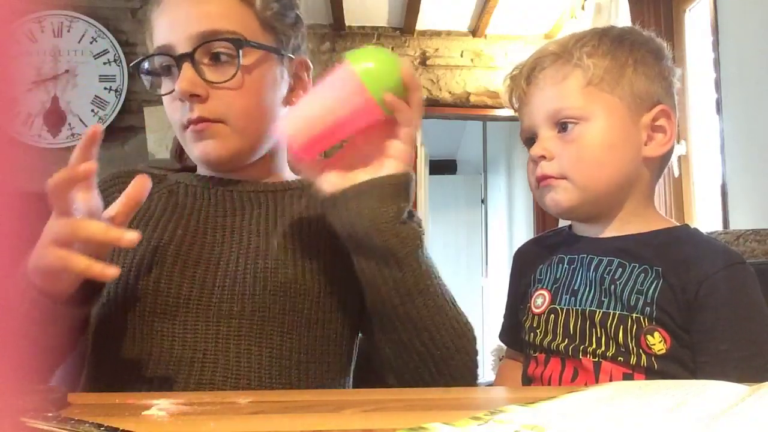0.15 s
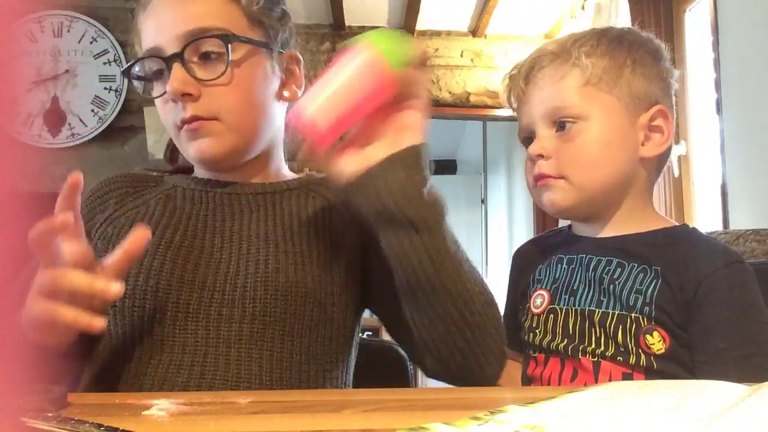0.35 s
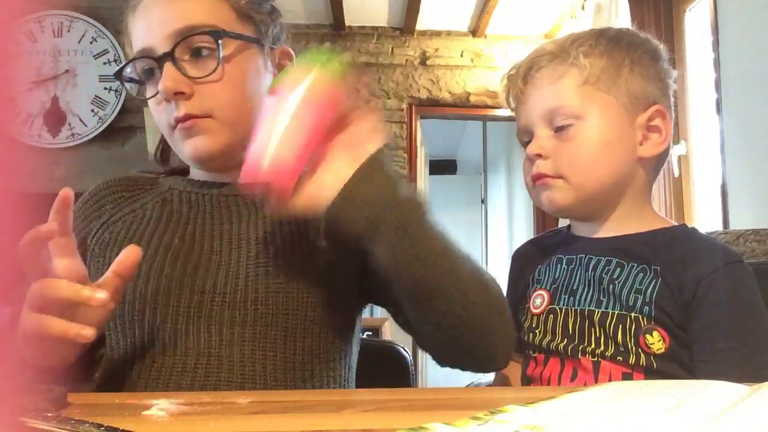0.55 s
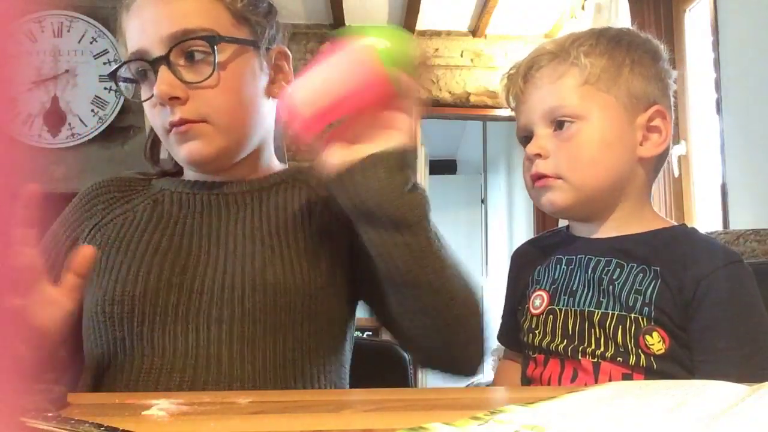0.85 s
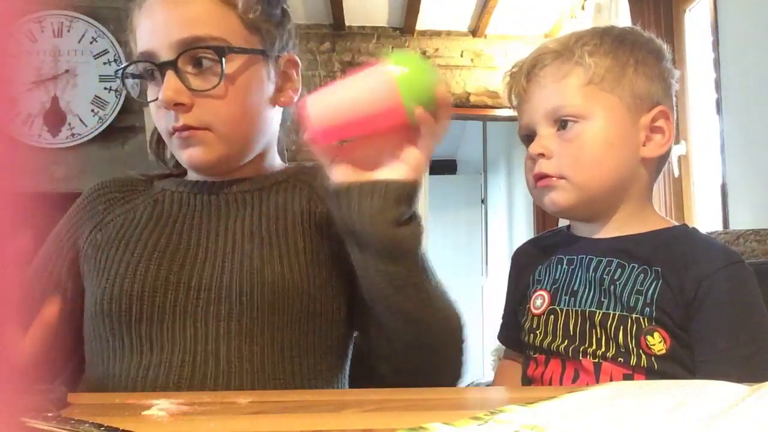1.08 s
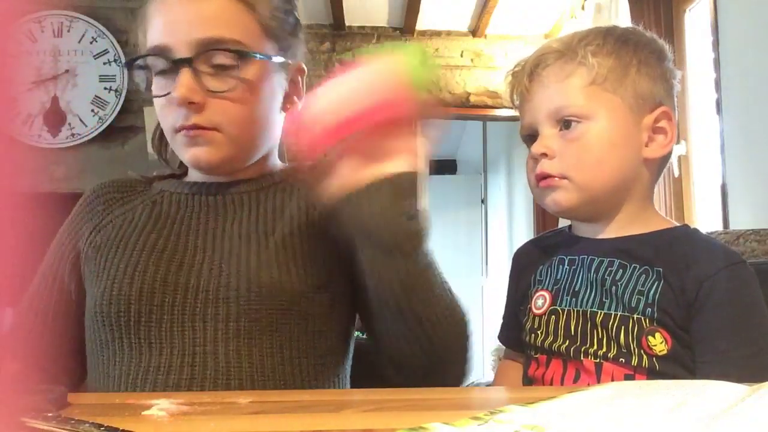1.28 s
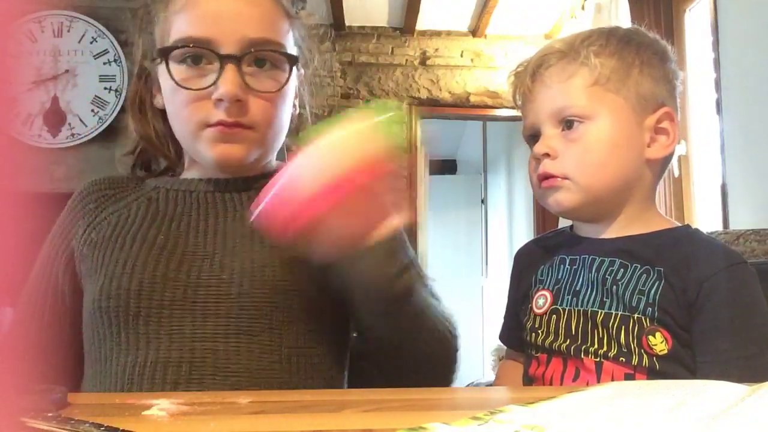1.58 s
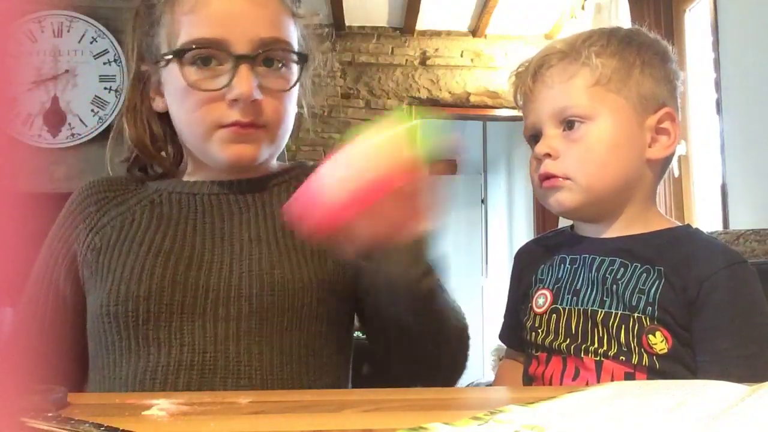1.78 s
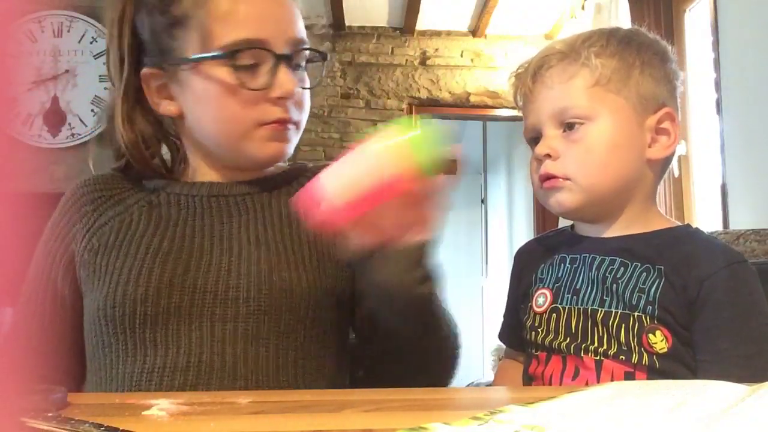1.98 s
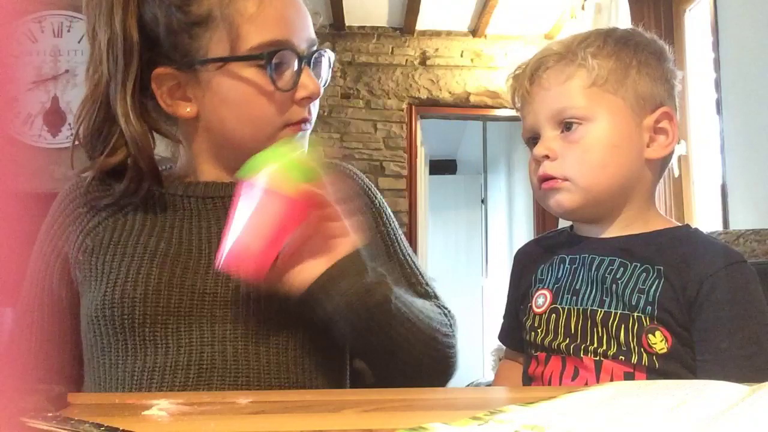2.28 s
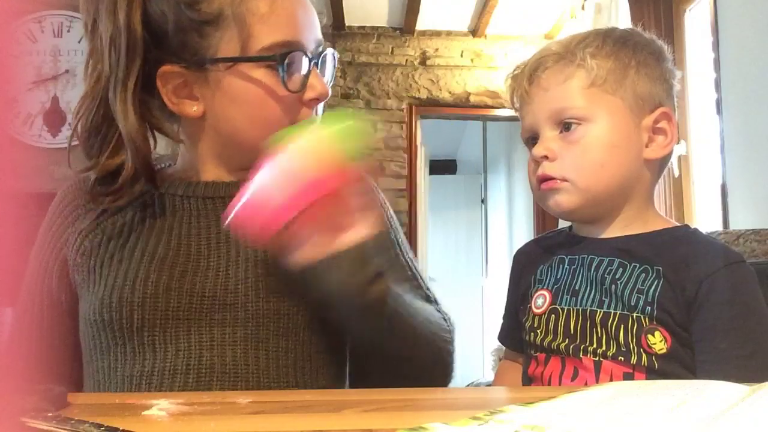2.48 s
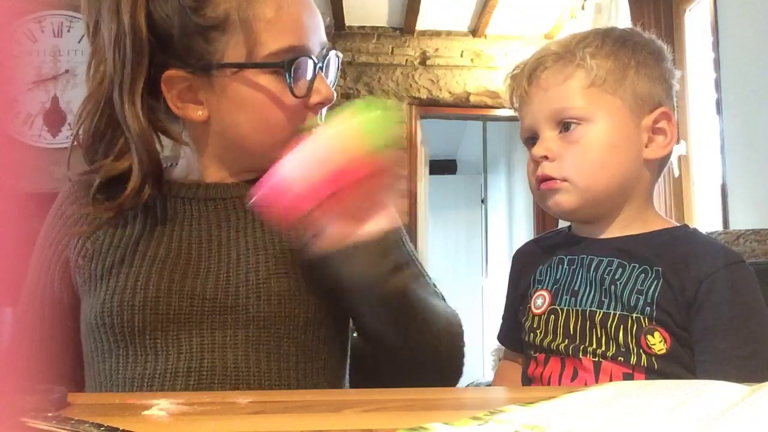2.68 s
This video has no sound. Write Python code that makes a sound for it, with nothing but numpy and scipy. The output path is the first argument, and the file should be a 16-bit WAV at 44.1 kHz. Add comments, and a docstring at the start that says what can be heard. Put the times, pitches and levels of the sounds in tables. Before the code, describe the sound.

Irregular hollow knocks and watery plops from a shaken plastic cup of drink, close by indoors

```python
"""Sharp knocks come first: a lidded plastic cup of drink, shaken by hand in a quiet room at home.
At each turn of the stroke the contents strike wall and lid, ringing the cup's modes and a band of high clicks.
Trapped air rings as short rising plops; splashes and stray bubbles tick as many small damped sines.
The room adds a short noise-like tail; behind it lie a faint hiss of shaped noise and a few dull bumps."""
import sys
import numpy as np
from scipy import signal
from scipy.fft import rfft, irfft
from scipy.io import wavfile

SR = 44100
rng = np.random.default_rng(int(sys.argv[2]) if len(sys.argv) > 2 else 0)


def master(y):
    """Save y as 16-bit WAV."""
    cut = np.clip(np.atleast_2d(y).T, -1, 1)
    pcm = np.round(cut * 32767)  # scale
    wavfile.write(sys.argv[1], SR, pcm.astype(np.int16))


N = 125685

# contents strike the cup: [t/s, hollow thud level/dB, wall knock level/dB, click level/dB, click f/Hz]
KNOCK_EVENTS = [(0.1034,-70.5,-60.5,-61,5260), (0.197,-81,-71.5,-56,4740), (0.2285,-49,-66,-46,4900),
                (.335,-59,-53,-48.5,4270), (0.3413,-33,-38.5,-36,4620), (0.4452,-62,-56,-65,4360),
                (0.452,-77,-55,-47,4800), (0.4644,-58,-50.5,-52,4100), (0.553,-58.5,-64,-53,4830),
                (0.563,-61,-57,-43.5,4700), (.6342,-89,-47,-46,5130), (0.667,-67,-43.5,-43,4360),
                (0.781,-56.5,-60.5,-41,4580), (0.7956,-80,-61,-40,5780), (.8787,-79,-47,-43.5,5200),
                (1.021,-65,-52,-49.5,5300), (1.1062,-47,-31,-42,4600), (1.216,-91,-92,-54.5,5600),
                (1.2476,-58.5,-54,-42.5,4320), (1.303,-52,-46,-43,5230), (1.3245,-55.5,-51.5,-55,4800),
                (1.3365,-81,-75,-44.5,4280), (1.452,-76,-64,-53,4180), (1.463,-53.5,-97,-45.5,5450),
                (1.528,-74,-56,-45.5,5130), (1.55,-60.5,-57.5,-35.5,4800), (1.558,-74,-93,-43.5,4720),
                (1.6736,-77,-58,-40,5440), (1.7921,-68,-57,-58,4800), (1.9037,-92,-52,-67,5360),
                (1.91,-49,-47,-48,4900), (1.9739,-60,-79,-50.5,4700), (2.062,-76,-63.5,-54.5,4220),
                (2.148,-47,-55,-54.5,5700), (2.2269,-85,-64,-64,4800), (2.235,-51.5,-42.5,-53,5950),
                (2.2512,-57.5,-47.5,-58,4470), (2.305,-63,-73,-64,4500), (2.328,-66,-65,-49,5300),
                (2.3318,-49.5,-58,-40.5,5340), (2.3385,-51.5,-43,-77,5440), (2.4656,-62,-58,-54.5,4800),
                (2.516,-66,-57,-58,5200), (2.569,-52,-77,-49,5030), (2.5782,-83,-55.5,-50.5,4760),
                (2.6864,-81,-68,-60,4450), (2.7796,-63,-76,-55,5700), (2.789,-55,-84,-78,5120),
                (2.815,-62,-66,-58,3700)]
# resonances of the filled cup, low to high: [f/Hz, level/dB, t60/s]
CUP_RESONANCES = [(434, -7, 0.025), (685, 4, 0.011), (790, 3.5, 0.024), (996, -3, 0.031), (1480, 3, 0.0015),
                  (1675, -4, 0.038), (1914, 7.5, 0.015), (2283, 0, 0.018)]
# air pockets ringing in the liquid: [t/s, starting f/Hz, level/dB, ring length/cycles to -60 dB]
AIR_POCKETS = [(.6340, 1044, -29.5, 14.5), (.6342, 1550, -26.5, 9.5), (0.667, 2490, -26, 16),
               (0.7968, 6300, -30, 27), (0.8782, 888, -21.5, 9.7), (.8786, 1350, -27, 14.7),
               (1.1062, 1770, -14.5, 17), (1.2250, 870, -39, 28), (1.2400, 790, -44.5, 36),
               (1.6796, 900, -34.5, 15.8), (1.682, 2210, -30, 47), (1.6900, 1082, -41, 44),
               (1.703, 2450, -40, 31), (1.7405, 2560, -34.5, 14.7), (1.9098, 628, -32.5, 21),
               (1.9726, 1010, -47, 37), (2.1473, 711, -28, 17.3), (2.3315, 736, -53, 70),
               (2.3391, 2160, -26.5, 12), (2.4613, 2560, -34, 15), (2.5692, 473, -26.5, 3.03),
               (2.5777, 1600, -37, 17), (2.6884, 830, -39.5, 7), (2.7812, 387, -34, 4.3),
               (2.7874, 1880, -40, 42)]
# liquid breaks against the wall: [t/s, length/s, droplet level/dB, typical droplet f/Hz, spray level/dB]
SPLASH_EVENTS = [(0.225, 0.022, -63, 4540, -93), (0.342, 0.024, -52, 3670, -53),
                 (0.449, 0.025, -55, 3130, -83), (0.551, 0.024, -52, 4650, -63.5),
                 (0.63, 0.036, -55, 3900, -80), (0.669, 0.038, -53, 2560, -85),
                 (0.784, 0.018, -52, 5200, -61), (0.883, 0.019, -58.5, 3830, -66),
                 (1.008, 0.046, -57.5, 4350, -91), (1.104, 0.03, -48, 2420, -61.5),
                 (1.216, 0.0091, -56.5, 5500, -69), (1.238, 0.014, -54.5, 4200, -83),
                 (1.302, 0.039, -50.5, 4380, -69), (1.46, 0.019, -51, 4830, -79),
                 (1.563, 0.01, -55, 4650, -75), (1.673, 0.026, -47.5, 4980, -76),
                 (1.788, 0.023, -62.5, 4740, -65.5), (1.901, 0.035, -58, 6050, -66),
                 (1.975, 0.033, -60.5, 5060, -85), (2.231, 0.014, -55, 4800, -84),
                 (2.326, 0.026, -47.5, 5640, -60.5), (2.565, 0.015, -56.5, 4800, -62),
                 (2.779, 0.015, -57.5, 5130, -69)]
# stray droplets over time: [t/s, level/dB]
SWIRL_LEVEL = [(0, -80.5), (.3, -75.5), (.5, -68), (1.0, -66.5), (1.6, -70), (1.87, -74.5), (2.0, -66.5),
               (2.13, -77.5), (2.45, -66.5), (2.75, -80), (2.82, -68.5)]
# stray droplets, weight by pitch: [f/Hz, level/dB]
SWIRL_SPECTRUM = [(500, 4), (1200, -4.5), (2200, 0.5), (3200, -3.5), (4900, -2), (6800, -10), (10000, -65)]
# room response: [f/Hz, early reflection level/dB, tail level/dB, tail t60/s]
ROOM_BANDS = [(150, -46, -4.5, 0.097), (396, -19.5, -10, 0.32), (920, -14.5, -11, 0.24),
              (2050, -7, -9, 0.28), (4800, -9.5, -7, 0.59), (7800, 2.5, -12, 0.098), (14100, -34, -18, 0.6)]
# dull bumps of an arm moving against the table: [t/s, f/Hz, level/dB]
ARM_BUMPS = [(.25, 173, -60), (1.737, 87.4, -55), (1.959, 86, -53), (2.021, 79, -52.5),
             (2.307, 120.5, -53.5), (2.397, 288, -50.5), (2.4, 87, -49), (2.459, 82, -56.5)]
# background hiss, relative spectrum: [f/Hz, level/dB]
HISS_SPECTRUM = [(20, -11.5), (60, 6), (120, 8), (300, 5), (700, -4), (1300, -20), (3000, -10),
                 (5000, -3.5), (9000, -9), (16000, -55)]

MODE_SCATTER_DB, MODE_DETUNE_SHARE = 2.0, 0.025  # standard deviations, per knock
THUD_TOP_HZ = 1300  # modes below form the thud, those above the wall knock
CLICK_T60_S, CLICK_HALF_WIDTH_SHARE = 0.014, 0.14  # dense high modes of thin plastic
PLOP_RISE_SHARE, PLOP_ATTACK_CYCLES = 0.17, 0.4
DROP_T60_CYCLES, DROP_SPREAD_DB, DROP_SPREAD_OCTAVES = 15.5, 5.5, 0.3
SPRAY_LOW_EDGE_HZ, SPRAY_T60_S = 6300, 0.035
SWIRL_DROPS_PER_S, SWIRL_SPREAD_DB = 1100, 4.5
RADIATION_HZ = 231  # a small cup radiates little below this
EARLY_T60_S, FIRST_ECHO_S = 0.16, 0.0032
BUMP_T60_CYCLES, BUMP_ATTACK_CYCLES = 12.6, 1
HISS_DB = -77.5
CUTOFF_HZ = 16000


def knocks():
    """Each knock rings the cup's low and middle modes and a dense cluster of high ones."""
    out, t = np.zeros(N), np.arange(SR // 20) / SR
    hz, db, t60 = np.transpose(CUP_RESONANCES)
    low = hz < THUD_TOP_HZ
    for s, thud_db, knock_db, click_db, click_hz in KNOCK_EVENTS:
        strength, detune = rng.standard_normal((2, len(hz)))
        mode_hz = hz * (1 + MODE_DETUNE_SHARE * detune)
        phase = 2 * np.pi * mode_hz[:, None] * t
        gain = from_db(db + MODE_SCATTER_DB * strength)[:, None]
        attack = 1 - np.exp(-phase / 2)
        modes = gain * np.sin(phase) * dying(t, t60[:, None]) * attack
        thud = from_db(thud_db) * struck(modes[low].sum(0))
        wall = from_db(knock_db) * struck(modes[~low].sum(0))
        width = 1 + CLICK_HALF_WIDTH_SHARE
        cluster = signal.butter(2, [click_hz / width, click_hz * width], "band", fs=SR, output="sos")
        burst = rng.standard_normal(len(t)) * dying(t, CLICK_T60_S)
        click = from_db(click_db) * struck(signal.sosfilt(cluster, burst))
        add(out, s, thud - wall + click)  # wall in opposite polarity
    return out


def plops():
    """Each air pocket is a damped sine that climbs a little in pitch."""
    out, t = np.zeros(N), np.arange(SR // 10) / SR
    for s, hz, db, cycles in AIR_POCKETS:
        t60 = cycles / hz
        climb = 1 + PLOP_RISE_SHARE * np.minimum(t / t60, 1)
        turns = np.cumsum(hz * climb) / SR
        attack = 1 - np.exp(-turns / PLOP_ATTACK_CYCLES)
        add(out, s, from_db(db) * np.sin(2 * np.pi * turns) * dying(t, t60) * attack)
    return out


def splashes(count=50):
    """Each splash is a burst of ringing droplets around one pitch, opened by a puff of fine spray."""
    out, t = np.zeros(N), np.arange(SR // 12) / SR
    fine = signal.butter(2, SPRAY_LOW_EDGE_HZ, "high", fs=SR, output="sos")
    for s, length, db, pitch, spray_db in SPLASH_EVENTS:
        size, octave = rng.standard_normal((2, count, 1))
        born = length * (np.arange(count)[:, None] + rng.random((count, 1))) / count
        drop_hz = np.minimum(pitch * 2 ** (DROP_SPREAD_OCTAVES * octave), CUTOFF_HZ)
        turns = drop_hz * np.maximum(t - born, 0)
        drops = from_db(DROP_SPREAD_DB * size) * np.sin(2 * np.pi * turns) * dying(turns, DROP_T60_CYCLES)
        burst = drops.sum(0)
        burst /= np.sqrt(np.sum(burst ** 2) / (length * SR))  # energy as of rms 1 over the length
        puff = rng.standard_normal(len(t)) * dying(t, SPRAY_T60_S)
        spray = struck(signal.sosfilt(fine, puff))
        add(out, s, from_db(db) * burst + from_db(spray_db) * spray)
    return out


def swirl(count=22):
    """Tiny bubbles of random size tick at randomly dealt pitches while the liquid runs about."""
    size_db = SWIRL_SPREAD_DB * np.minimum(rng.exponential(1, N), 3)
    sizes = from_db(size_db) * rng.choice([-1, 1], N)
    clicks = sizes * (rng.random(N) < SWIRL_DROPS_PER_S / SR)
    dealt = rng.integers(0, count, N)
    out = np.zeros(N)
    for k, hz in enumerate(np.geomspace(550, 9000, count)):
        r, w = dying(1 / SR, DROP_T60_CYCLES / hz), 2 * np.pi * hz / SR
        excitation = clicks * (dealt == k) + 1e-18
        ring = signal.lfilter([1, 0, -1], [1, -2 * r * np.cos(w), r * r], excitation)
        out += from_db(at_hz(SWIRL_SPECTRUM, hz)) * np.sqrt(hz) * rms_one(ring)
    return level(SWIRL_LEVEL) * rms_one(out)


def room(x):
    """Reflections from table and walls plus a diffuse tail, as noise decaying band by band."""
    t = np.arange(SR * 2 // 3) / SR
    response = np.zeros(len(t))
    edges = np.geomspace(90, 17000, 13)
    for low, high in zip(edges, edges[1:]):
        hz = np.sqrt(low * high)
        band = signal.butter(2, [low, high], "band", fs=SR, output="sos")
        bandwidth_gain = np.sqrt(2 * (high - low) / SR / len(t))
        early = at_hz(ROOM_BANDS, hz, axis=1), EARLY_T60_S
        late = at_hz(ROOM_BANDS, hz, axis=2), at_hz(ROOM_BANDS, hz, axis=3)
        for db, t60 in (early, late):
            decay = rng.standard_normal(len(t)) * dying(t, t60) * (t > FIRST_ECHO_S)
            response += from_db(db) * rms_one(signal.sosfilt(band, decay)) * bandwidth_gain
    return signal.fftconvolve(x, response)[:N]


def bumps():
    """Each bump swells and dies as one low, damped resonance."""
    out, t = np.zeros(N), np.arange(SR // 4) / SR
    for s, hz, db in ARM_BUMPS:
        turns = hz * t
        attack = 1 - np.exp(-turns / BUMP_ATTACK_CYCLES)
        add(out, s, from_db(db) * np.sin(2 * np.pi * turns) * dying(turns, BUMP_T60_CYCLES) * attack)
    return out


def hiss():
    """Steady Gaussian noise shaped by the hiss spectrum."""
    hz = np.arange(N // 2 + 1) * SR / N
    spectrum = rfft(rng.standard_normal(N)) * from_db(at_hz(HISS_SPECTRUM, hz))
    return from_db(HISS_DB) * rms_one(irfft(spectrum, N))


def from_db(db):
    """Decibels to gain."""
    return 10 ** (np.asarray(db) / 20)


def rms_one(x):
    """Scale to rms 1."""
    return x / np.sqrt(np.mean(x ** 2) + 1e-20)


def struck(x, size=220):
    """Scale a ring to rms 1 over its first five milliseconds."""
    return x / np.sqrt(np.mean(x[:size] ** 2) + 1e-20)


def dying(t, t60):
    """Exponential decay, -60 dB at t60 (both in seconds or both in cycles)."""
    return np.exp(-np.log(1000) * t / t60)


def at_hz(points, hz, axis=1):
    """Read one column of a table on a log-frequency axis."""
    table = np.array(points)
    return np.interp(np.log(hz + 1e-6), np.log(table[:, 0]), table[:, axis])


def level(curve):
    """Gain over time from t/s, level/dB points."""
    s, db = np.transpose(curve)
    return from_db(np.interp(np.arange(N) / SR, s, db))


def add(out, s, sound):
    """Mix a sound in at time s."""
    i = int(np.clip(s * SR, 0, N - 1))
    out[i:i + len(sound)] += sound[:N - i]


def scene():
    """The shaken cup, direct and through its room, over hiss and bumps."""
    radiation = signal.butter(1, RADIATION_HZ, "high", fs=SR, output="sos")
    cup = signal.sosfilt(radiation, knocks() + plops() + splashes() + swirl())
    return (cup + room(cup) + bumps() + hiss())[None]


def record(dry):
    """Steep elliptic low-pass at the cutoff."""
    low_pass = signal.ellip(10, 0.2, 80, CUTOFF_HZ, fs=SR, output="sos")
    return signal.sosfilt(low_pass, dry)


dry = scene()
out = record(dry)
master(out)
```